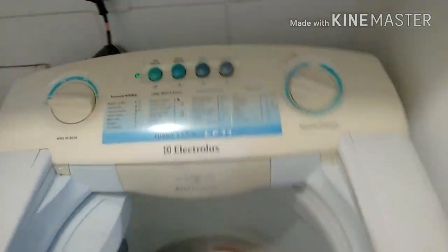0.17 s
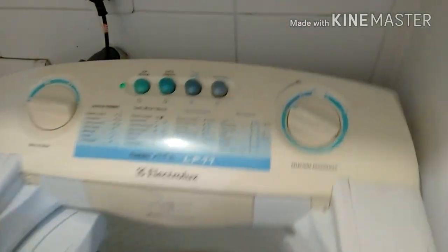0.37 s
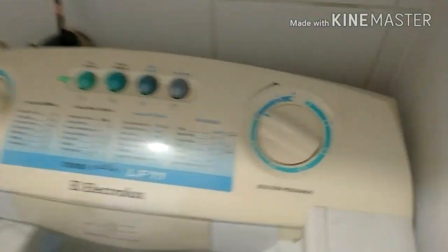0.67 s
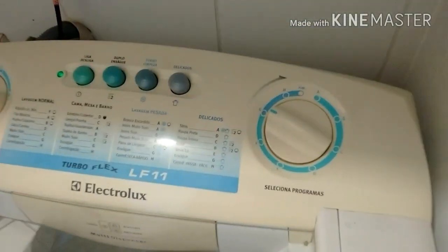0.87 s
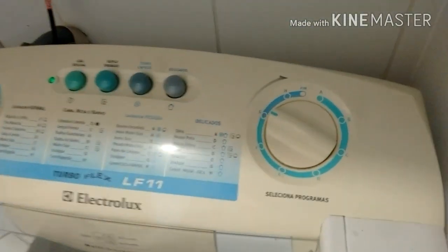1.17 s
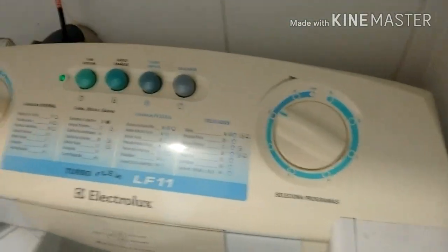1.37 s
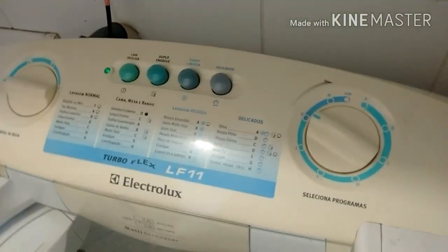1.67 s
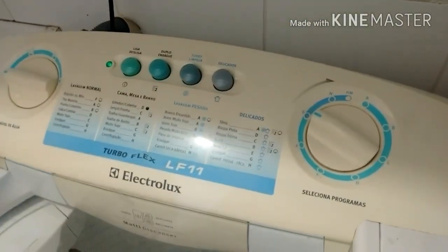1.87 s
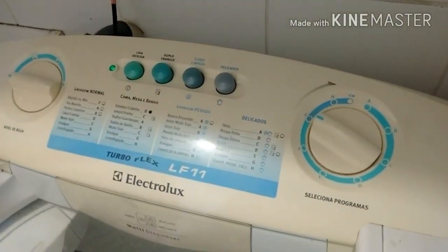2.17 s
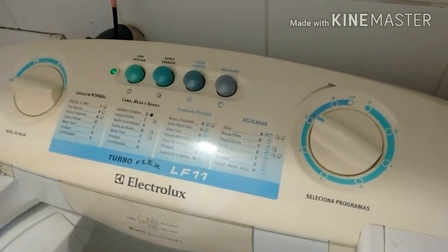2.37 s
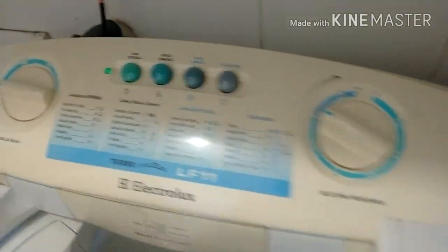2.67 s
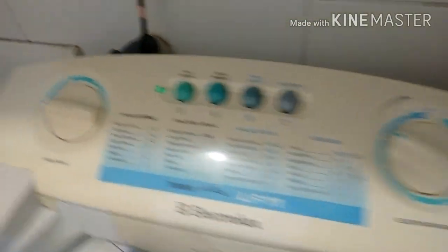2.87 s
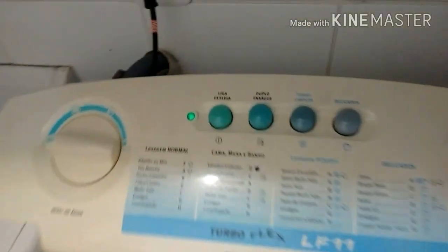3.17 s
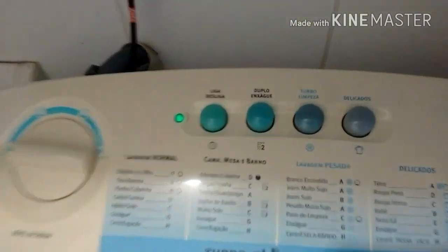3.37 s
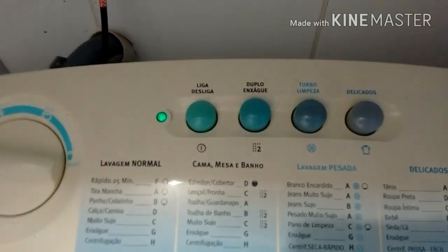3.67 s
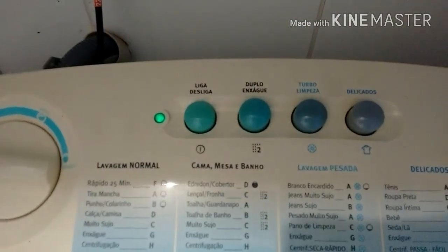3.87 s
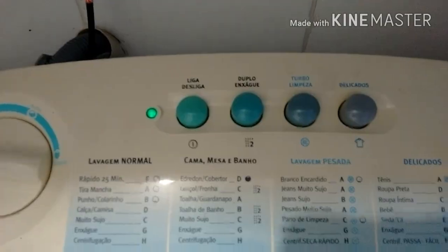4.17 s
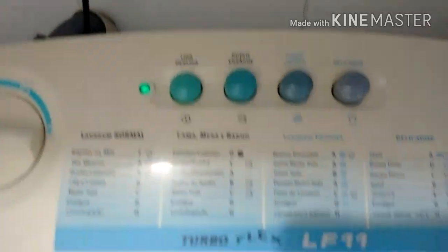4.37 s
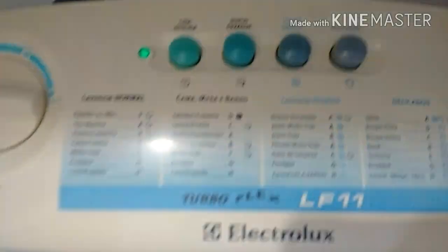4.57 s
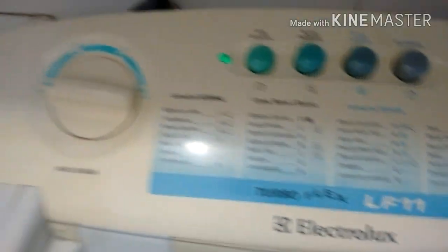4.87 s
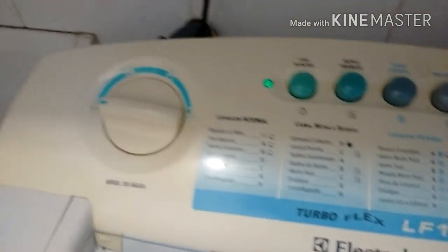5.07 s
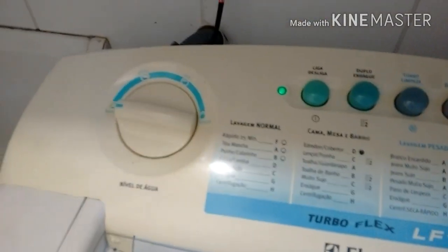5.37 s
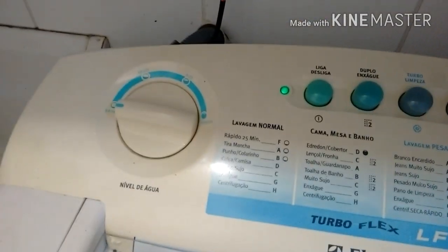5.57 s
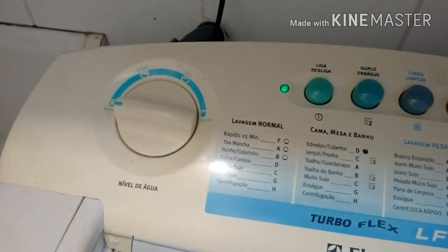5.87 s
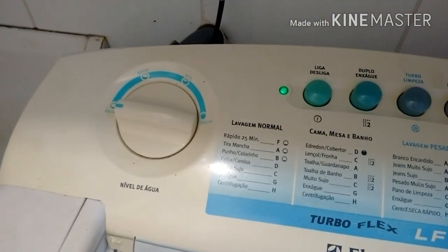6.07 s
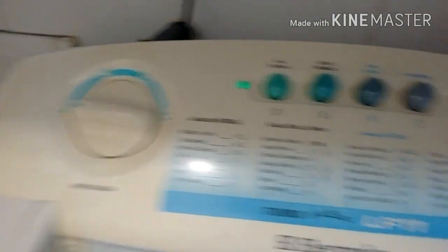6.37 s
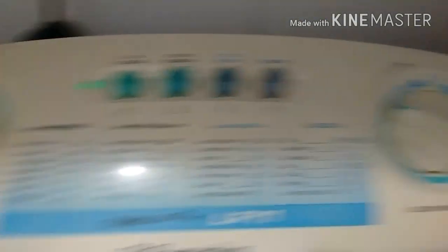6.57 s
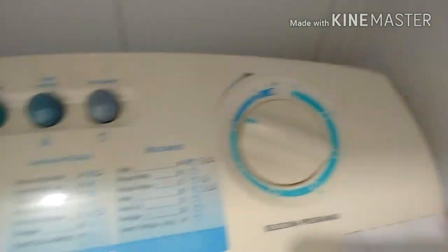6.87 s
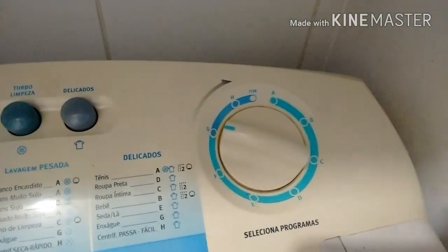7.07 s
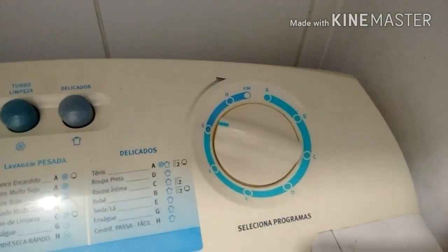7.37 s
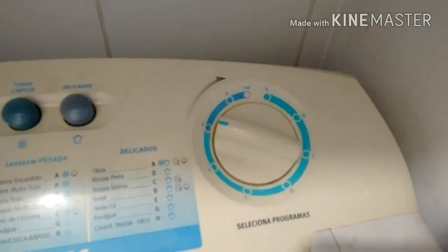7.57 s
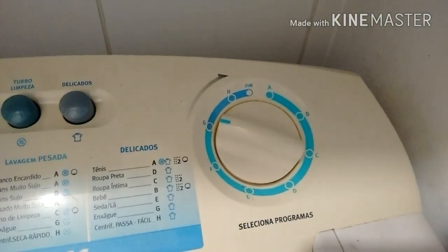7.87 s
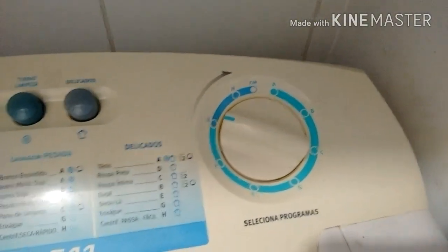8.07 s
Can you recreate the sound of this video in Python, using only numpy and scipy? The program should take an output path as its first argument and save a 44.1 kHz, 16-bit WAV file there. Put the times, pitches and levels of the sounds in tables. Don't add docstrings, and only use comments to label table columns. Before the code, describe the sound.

A washing machine spins steadily close by in a tiled room, a buzzing low hum under a rough airy whir with faint spray puffs.

```python
import sys
import numpy as np
from scipy import signal
from scipy.io import wavfile
from scipy.ndimage import uniform_filter1d

SR = 44100
rng = np.random.default_rng(int(sys.argv[2]) if len(sys.argv) > 2 else 0)


def unload_audio(sound):
    columns = np.transpose(np.atleast_2d(sound))
    steps = np.round(np.clip(columns, -1, 1) * 32767)
    wavfile.write(sys.argv[1], SR, steps.astype(np.int16))


def nominal_scale(level):
    x = np.asarray(level, float) / 20
    return 10 ** x


N = 362502
MAINS_HZ = 59.98


def evened(x):
    return x / np.sqrt(np.mean(x ** 2) + 1e-20)


def read(points, hz):
    f, value = np.transpose(points)
    return np.interp(np.log(hz + 1), np.log(f + 1), value)


def curve(rows, t):
    s, *columns = np.transpose(rows)
    return [np.interp(t, s, c) for c in columns]


def drift(t, top_hz):
    hz = np.geomspace(.2, top_hz, 16)[:, None]
    waves = np.sin(2 * np.pi * (hz * t + rng.random((16, 1)))) / np.sqrt(hz)
    return evened(waves.sum(0))


def bump(x, middle, width):
    return np.exp(-((x - middle) / width * 2) ** 4)


# t/s, along the panel (-1 left to 1 right), into the corner (-1 to 1),
# nearness/dB, turn as left minus right/dB
HAND = [(0, -0.12, -0.22, -3, -1), (.3, 0.28, 0.2, -2, 1), (.75, 0.8, -0.6, -1, -0.5),
        (1.7, 1, -0.97, -0.5, -2), (2.75, 0.98, -0.42, 0, -0.5), (2.95, 0.39, -0.25, 0.5, -1.5),
        (3.3, -0.25, 0.22, -0.5, -1), (4.4, -0.83, 0.15, 0, -0.6), (4.75, -1.13, 0.38, 0.4, 0),
        (5.15, -0.43, -0.38, 1.5, -2.5), (5.6, -0.93, -0.076, 0, -1), (6.4, -1.27, 0.25, -1.7, -0.7),
        (6.85, 0.87, 1.65, -1.2, -1.5), (7.2, 0.76, 0.92, 0.5, -0.1), (7.5, 0.71, 0.76, 0.5, -1),
        (8.3, 1, 1.1, 0, -1.5)]


def at_hand(laws, t):
    along, corner = curve(HAND, t)[:2]
    return np.asarray(laws) @ [np.ones(len(t)), along, corner]


# multiple of the mains, level at mid panel/dB, change per step along/dB,
# change per step into the corner/dB
HUM_LEFT = [(2, -51.5, -2.5, -3.5), (3, -60.5, 8, 1), (4, -47, 2.5, 3), (5, -37, 0, 2.5), (6, -31, 1.3, 1),
            (7, -43, -3.5, -1), (8, -38, 1.3, 0), (9, -50, 6, 2), (10, -41.5, 0, -2.5), (11, -46.5, -4, 0),
            (12, -58.5, 11.5, -10), (13, -49.5, 3.5, 4), (14, -52.5, -9, -15), (15, -54.5, -3, 3),
            (16, -65, 1.9, -4.0), (17, -71.5, -2, 1), (18, -65, -9, 3.4)]
HUM_RIGHT = [(2, -52.5, 0.5, -0.5), (3, -54.5, 1.5, -2), (4, -39, -1.6, 0.7), (5, -39.5, 4.5, 0.7),
             (6, -30, -1.6, 0.2), (7, -41, -2, -6), (8, -40.5, 2.5, 2), (9, -48, -1, 5), (10, -40, -2, -2),
             (11, -46.5, -7, -4), (12, -44.5, 8, -1), (13, -53.5, 18.5, -0.5), (14, -50, -7.5, -3),
             (15, -50, 3.5, 0.5), (16, -69, 8, -4), (17, -66, -4, -6), (18, -73, -7, 1)]
HUM_LEAD = [(2, 2.5, -1, 1.7), (3, -0.5, -0.39, 0.2), (4, 0.62, -0.034, -0.3), (5, 1.5, -1.3, 0.42),
            (6, 0.08, -0.46, -0.1), (7, -0.9, -0.39, 1), (8, 1, -0.79, 0), (9, -0.4, 1.2, 0.1),
            (10, 0, -0.97, 0.2), (11, -0.4, -0.82, 0), (12, 0.7, -0.38, 0.3), (13, 1.0, 0.32, 0.6),
            (14, -1.8, -1.5, -2.5), (15, -0.3, 0.19, 1.6), (16, 0, 0.86, 0), (17, -1, -0.11, 4),
            (18, -0.5, 0.1, -0.7)]
# middle t/s, length/s, multiple of the mains, level/dB
NODES = [(3.3, .6, 5, -6), (4.5, .7, 5, 2), (6.2, .4, 5, 3), (.3, .7, 5, -3), (7.9, .6, 5, -2),
         (3.8, .12, 6, 3), (5.65, .15, 6, -4), (4.15, .2, 6, -2), (7.8, .4, 6, -2), (6.9, .4, 6, 2.5),
         (3.3, .6, 6, 1.5), (.45, .8, 7, 6), (2.2, .4, 7, 4), (4., .8, 7, -2), (7.7, .9, 7, 2),
         (.55, 1.1, 8, -5), (3.9, .6, 8, -4), (5.6, .8, 8, -4), (3.15, .9, 9, -18), (5.8, .4, 9, -8),
         (1.6, 1., 9, 4), (4.4, .7, 9, 3), (6.7, .9, 9, -4), (5., .4, 9, -4), (3.3, .6, 10, 5),
         (5.7, .8, 10, -2), (6.8, .8, 10, 2), (2.6, 1.2, 11, -8), (.6, .5, 11, -5), (4.5, 1., 11, -4),
         (5.2, .8, 11, -6), (7.3, .6, 11, 5), (3.05, .6, 12, -18), (4.4, .8, 12, 8), (5.2, .8, 12, -8),
         (6.2, 1., 12, 4), (2.4, 1.6, 13, -6), (3.6, .8, 13, 4), (5.4, .4, 13, 7), (7., .4, 13, -8),
         (8., .7, 13, -9), (3.1, .7, 14, 10), (3.9, .6, 14, -6), (.2, .4, 14, 8), (7., .4, 14, -5),
         (1.8, 3., 15, -4), (6.2, .4, 15, -5), (2.9, .7, 4, -2), (.4, .9, 4, -2), (4.1, .7, 4, 1.5)]
HUM_FOLLOWS = 0.97


def hum(spread_rad=1.8, waver_db=.8, wander_rad=.2):
    t, slow = np.arange(N) / SR, np.arange(0, N / SR + .02, .01)
    out = np.zeros((2, N))
    for rows in np.transpose([HUM_LEFT, HUM_RIGHT, HUM_LEAD], (1, 0, 2)):
        k = round(rows[0, 0])
        change_db = HUM_FOLLOWS * curve(HAND, slow)[2] + waver_db * k / 6 * drift(slow, 10)
        for s, length, multiple, db in NODES:
            if round(multiple) == k:
                change_db = change_db + db * bump(slow, s, length)
        left_db, right_db, lead = at_hand(rows[:, 1:], slow)
        wander = np.interp(t, slow, wander_rad * k / 6 * drift(slow, 5))
        turn = 2 * np.pi * k * MAINS_HZ * t + spread_rad * k ** 2 + wander
        out[0] += np.interp(t, slow, nominal_scale(left_db + change_db)) * np.cos(turn + np.interp(t, slow, lead))
        out[1] += np.interp(t, slow, nominal_scale(right_db + change_db)) * np.cos(turn)
    return np.sqrt(2) * out


# f/Hz, left level/dB, right level/dB, left lead/rad
TONES = [
    (117.3, -55, -56, 1.2),
    (46.6, -59, -64, .3),
    (55, -66, -70, .3),
    (9732, -90, -82, 1.5),
]
# start t/s, end t/s, level over its floor/dB
WHINE = [
    (1.0, 2.7, 9.5),
    (4.5, 6.5, 10.5),
    (6.5, 7.5, 5.5),
]
WHINE_HZ, WHINE_DB, WHINE_RISE_S = 4807, -75.5, .2


def tones(waver_db=1.4):
    t = np.arange(N) / SR
    slow = t[::400]
    out = np.zeros((2, N))
    for hz, left_db, right_db, lead in TONES:
        level = nominal_scale([[left_db], [right_db]]) * np.interp(t, slow, nominal_scale(waver_db * drift(slow, 9.8)))
        wander = np.interp(t, slow, 1.6 * drift(slow, 2))
        out += level * np.sin(2 * np.pi * hz * t + wander + [[lead], [0]])
    swell_db = sum(db * np.clip(np.minimum(t - a, b - t) / WHINE_RISE_S + .5, 0, 1) for a, b, db in WHINE)
    whine = nominal_scale(WHINE_DB + swell_db + [[-3], [0]]) * np.sin(2 * np.pi * WHINE_HZ * t + [[2.4], [0]])
    return np.sqrt(2) * (out + whine * np.interp(t, slow, nominal_scale(waver_db * drift(slow, 6))))


# f/Hz, coherence (0-1)
SAME = [(40, 0.63), (100, 0.19), (210, 0.94), (280, 0.9), (380, 0.73), (1100, 1), (3600, 0.8), (5500, 0.31),
        (8600, 0.68), (9600, 0.16), (15000, .25)]


def port_noise(frames, hz, first_hz=1020, step_hz=1250, skew=0.8):
    a, b, c, d = rng.standard_normal((frames, len(hz), 4)).T
    turn = np.pi * np.maximum(hz - first_hz, 0) / step_hz
    lean = np.clip(skew, 0, 1) / (1 + (hz / 4500) ** 8)
    same = (np.clip(read(SAME, hz), 0, 1) * (np.cos(turn) - 1j * lean * np.sin(turn)))[:, None]
    right = a + 1j * b
    left = same * right + np.sqrt(1 - abs(same) ** 2) * (c + 1j * d)
    return np.array([left, right])


# f/Hz, width/Hz, level over the bed at mid panel/dB, change per
# step along/dB, change per step into the corner/dB
MODES = [(48.6, 13.4, 14, -2.5, -1), (111, 21, 6, 0, 0.5), (195.2, 6.6, 11.5, 0, -0.5),
         (268.1, 14.4, 8, -0.3, 1), (351.1, 6.1, 14.5, -1, 4), (444, 41, 6.5, -0.4, 1.5),
         (507.5, 12.6, 11, 0.8, -2), (577.7, 51, 9.5, 1.5, 1.5), (669, 33, 7, 2, 0),
         (739, 43, 7.5, -1.2, -2), (803, 24, 6, -1.5, 3), (823, 61, 1, -1, -2),
         (1005, 19, 5, 1, -2.5), (1115, 46, 7, -0.5, 4), (1223, 47, 1.5, 4, -3.5), (1447, 40, 9, -3, 8),
       (1552, 91, 11.5, 1.5, 2), (1666, 104, 8, -1, 0.5), (1825, 48, 5, -4.5, 0), (2043, 100, 7.5, 0.7, -1),
       (2270, 52, 4, 0, -6.5), (3354, 25, 3.5, -5, 3.5), (3555, 26, 7.5, -1, 2), (3800, 100, 5, -0.5, 0),
       (4090, 100, 4.5, -0.5, 1.5)]


def panel_ring(hz, t, sway=0.0096):
    ring = 0
    for f, width, *law in MODES:
        height = (nominal_scale(at_hand(law, t)) ** 2 - 1).clip(0)
        offset = 2 * (hz[:, None] - f * (1 + sway * drift(t, 2))) / width
        ring = ring + height / (1 + offset ** 2) ** 2
    return ring


# middle t/s, length/s, f/Hz, width/Hz, level/dB
SWELLS = [(3, 0.37, 1560, 150, 6), (2.02, 1.2, 1540, 48, 5.5), (4.24, 1.5, 1710, 160, 5.5),
          (4, 1.9, 1730, 90, -3), (5.53, 1.8, 1450, 70, 5.5), (6, 2., 1560, 70, -1), (3.3, 0.16, 900, 61, 6),
          (6.4, 0.17, 1100, 90, 3), (5.7, 0.56, 1110, 54, -0.5), (1.6, 2.7, 1190, 140, 1),
          (7.54, 1.9, 1300, 100, 7.5), (4.7, 1.2, 1200, 110, -7), (0.4, 0.83, 945, 47, 9),
          (0.55, 0.5, 1450, 80, 6), (7., 0.67, 1560, 120, 0.5), (1.4, 1.1, 576, 80, 3),
          (1., 0.23, 500, 50, 2.5), (8.1, 0.44, 420, 67, 2), (3.94, 0.29, 750, 170, 4.5),
          (4.65, 1.2, 600, 120, 4), (6.4, 0.44, 590, 110, -3.5), (7.8, 2.3, 800, 51, 3),
          (5.67, 2.4, 840, 53, 5), (8.5, 1.2, 200, 40, 2), (2.3, 1.1, 3400, 130, 7), (1.95, .6, 3200, 88, 8),
          (0.73, 0.064, 3600, 1500, 5), (3.5, 1, 3300, 350, 2), (5.05, 0.27, 3300, 310, 3),
          (3.1, .4, 3900, 350, -1), (7.1, 0.4, 3820, 560, 3.5), (6.7, .4, 3020, 270, 6.5),
          (9.3, .4, 2300, 150, 3), (7.85, 0.14, 3800, 900, 4.5), (5.46, .6, 3500, 1100, -2.5),
          (1.44, 0.23, 3500, 1200, 0.5), (4.3, .5, 2200, 200, -1), (1.76, 0.19, 3400, 2900, -3),
          (7.55, 0.35, 3200, 1200, -2.5), (4.8, 0.35, 3300, 1100, -4),
          (.05, .6, 480, 300, -4), (.05, 1.2, 1530, 90, -4.4), (.05, 1.2, 1650, 200, 2.7),
           (.05, 1.2, 2310, 90, -5.8), (.05, 1.2, 2560, 90, -4.3), (1.14, .6, 1290, 90, 4.3),
           (1.5, .4, 780, 250, 2.5), (2.16, .6, 790, 90, 4.9), (2.21, 1.2, 2170, 90, -4.4),
           (2.48, 1.2, 2030, 90, -4.9), (3.44, 1.2, 1150, 90, 3.5), (3.69, 1.2, 2400, 90, 4.3),
           (4.2, 1.2, 2540, 90, -4.7), (4.43, .3, 1100, 1600, -2.1), (4.46, 1.2, 2030, 90, -4.5),
           (5.32, 1.2, 2380, 200, -3.9), (5.62, .3, 1410, 90, -7), (5.76, 1.2, 2710, 90, -5.2),
           (5.8, .3, 700, 600, -1.7), (5.8, 1.2, 1670, 90, -4.7), (5.99, 1.2, 2230, 90, 5.3),
           (6.18, 1.2, 1780, 90, 4.1), (7.22, 1.2, 2400, 90, 4), (7.48, .6, 1260, 90, -5),
           (8.29, .3, 790, 200, 6), (8.29, .6, 520, 90, -4), (8.29, 1.2, 2210, 90, 4.5),
           (8.29, 1.2, 2550, 90, -4.8), (.75, .3, 780, 250, -2), (6.35, .3, 560, 150, 2),
           (5.1, .3, 3450, 300, 2), (7., .7, 3600, 900, 2), (6.75, .9, 2400, 900, 2.5),
           (1.1, .3, 3500, 1000, 2), (4.75, .3, 2400, 800, 2), (.4, .3, 1110, 70, 4),
           (2.6, .5, 1110, 70, -2.5), (6.9, .4, 1110, 70, -3.5), (7.65, .25, 185, 50, -4),
          (.4, 1., 990, 40, -6),
    (3.15, .3, 1150, 300, -2.5),
    (6.1, 1.3, 860, 60, 5),
    (3.6, 1., 800, 40, 3),
    (4.8, .6, 3500, 500, 1.5),
    (6.4, .3, 560, 170, 2.5),
    (4.2, .3, 560, 170, 2),
    (3.25, .3, 1550, 500, 2.5),
    (7.9, .3, 560, 170, -2),
    (4.85, .7, 1125, 60, -3),
]
# f/Hz, width/Hz, level/dB
LASTING = [(195, 18, 3), (213, 14, -4), (266, 12, 2), (280, 10, -3), (342, 12, -2), (690, 24, 2.5),
           (767, 22, -3), (865, 40, -2.5), (1115, 50, -3), (330, 16, -1.5), (395, 20, -1.5), (630, 30, -1.5),
           (3290, 30, 3), (3690, 30, -2), (3840, 30, 3), (1900, 180, 2), (2220, 60, 2.5), (2420, 60, 2),
           (3620, 60, 3), (3950, 110, 2), (4240, 110, 3), (4640, 120, 3)]


def swells_and_dips_db(hz, t):
    passing = sum(db * bump(t, s, length) * bump(hz[:, None], f, width)
                  for s, length, f, width, db in SWELLS)
    return passing + sum(db * bump(hz[:, None], f, width) for f, width, db in LASTING)


def mottled(bins, frames, over_bins, over_frames):
    x = uniform_filter1d(rng.standard_normal((bins, frames)), size=over_bins, axis=0)
    return evened(uniform_filter1d(x, size=over_frames, axis=1))


# f/Hz, level per Hz/dB
BED = [(15, -87), (32, -83), (75, -77.5), (155, -76.5), (235, -67), (400, -61.5), (820, -65.5), (950, -71),
       (2600, -80.5), (3500, -81), (4700, -88), (8200, -97), (12000, -92), (15400, -93.5)]
# f/Hz, left minus right level/dB
TILT = [(25, -1), (45, -4), (110, 4.5), (200, -3), (330, 1), (750, -2.5), (1100, -0.5), (1650, -3.5),
        (2600, -3), (8600, -1.5), (10400, -3), (11300, -8), (12300, -5.5), (13000, -11), (15400, -6)]
RUMBLE_FOLLOWS, WHIR_FOLLOWS, HISS_FOLLOWS = 0.19, 1, 0.29
SWELL_DB, STREAK_DB = .55, 1.7


def machine_noise(size=4096, patchy_db=1.35):
    hop = size // 4
    frames, hz = N // hop + 5, np.fft.rfftfreq(size, 1 / SR)
    t = np.arange(frames) * hop / SR
    near_db, pan_db = curve(HAND, t)[2:]
    mid, top = (1 / (1 + (edge_hz / (hz[:, None] + 1)) ** 4) for edge_hz in (1200, 6500))
    follows = (1 - mid) * RUMBLE_FOLLOWS + (mid - top) * WHIR_FOLLOWS + top * HISS_FOLLOWS
    level_db = follows * near_db + SWELL_DB * (mid - top + 0.31) * drift(t, 5)
    level_db = level_db + patchy_db * (0.47 + 0.86 * mid - 0.26 * top) * mottled(len(hz), frames, 20, 3)
    level_db = level_db + STREAK_DB * (mid - top + 0.3) * mottled(len(hz), frames, 4, 24)
    level_db = level_db + swells_and_dips_db(hz, t)
    right = nominal_scale(read(BED, hz)[:, None] + level_db) * np.sqrt(1 + panel_ring(hz, t))
    tilt_db = read(TILT, hz)[:, None] + pan_db - pan_db.mean()
    z = port_noise(frames, hz) * right * [nominal_scale(tilt_db), np.ones_like(tilt_db)]
    return signal.istft(z, nperseg=size, noverlap=size - hop)[1][:, :N] * nominal_scale(13.0)


def bursts(rows, length_s, rise_s=0.0054):
    s = np.arange(N) / SR
    slow = s[::64]
    total = 0
    for at, db in rows:
        rise = np.clip((slow - at) / rise_s, 0, 1)
        total = total + nominal_scale(db + 36.5) * rise * np.exp(-(np.maximum(slow - at, 0) / length_s) ** 2)
    return np.interp(s, slow, total)


def flicker(db):
    x = uniform_filter1d(rng.standard_normal(N), size=900)
    return nominal_scale(db * evened(uniform_filter1d(x, size=900)))


def band(x, order, hz, kind, both_ways=signal.sosfiltfilt):
    return both_ways(signal.butter(order, hz, kind, fs=SR, output="sos"), x)


# t/s, peak level/dB
PUFFS = [(2.222, -40), (2.552, -48), (2.898, -42), (3.14, -36), (3.185, -44), (3.89, -48), (4.19, -41),
         (4.495, -43), (4.575, -43), (4.683, -50), (4.962, -43), (5.065, -48), (5.108, -44), (5.205, -48),
         (5.749, -36), (6.135, -52), (6.18, -42), (6.62, -46), (6.94, -40), (7.19, -39), (7.23, -44),
         (7.7, -41), (7.83, -47), (8.07, -47)]
# t/s, peak level/dB
KNOCKS = [
    (.122, -38),
    (.448, -42),
    (2.135, -35),
    (3.58, -37),
    (4.666, -37),
    (5.773, -40),
    (6.177, -39),
    (7.478, -39),
]
PUFF_S, KNOCK_S = 0.03, .013
JOLT = 0.25
RUSH_DB, RUSH_ENDS_S = -6, .31


def rumble_and_hiss(throb=0.056):
    x, s = machine_noise(), np.arange(N) / SR
    treble = band(x, 2, (1100, 6000), "band")
    wall = band(x, 2, (1600, 2900), "band")
    spray = band(x, 2, 7000, "high")
    whir = band(x, 1, (500, 2500), "band")
    jolts, knocks = bursts(PUFFS, PUFF_S), bursts(KNOCKS, KNOCK_S)
    rush = nominal_scale(RUSH_DB) * bump(s, 0, 2 * RUSH_ENDS_S) ** 2
    torque = throb * np.cos(4 * np.pi * MAINS_HZ * s) + 0.13 * np.cos(2 * np.pi * MAINS_HZ * s)
    out = (1 + JOLT * jolts) * x + knocks * wall + (flicker(.9) - 1) * treble
    out += (jolts + rush + flicker(.9) - 1) * spray * [[.6], [1]]
    return out + torque * whir


# t/s, left level/dB, right level/dB, f/Hz
THUMPS = [
    (.03, -52, -40, 40),
    (1.034, -44, -31, 135),
    (2.905, -33, -28, 135),
    (3.185, -39, -37, 140),
]
# t/s, left level/dB, right level/dB, f/Hz
TICK = (6.387, -25, -39, 7500)


def handling():
    out = np.zeros((2, N))
    for s, left_db, right_db, hz in THUMPS + [TICK]:
        middle = round(s * SR)
        at = np.arange(max(middle - 1300, 0), middle + 1300)
        u = (at / SR - s) * hz * 2.2
        pulse = (1 - 2 * u ** 2) * np.exp(-u ** 2)
        out[:, at] += nominal_scale([[left_db], [right_db]]) * [[-1], [1]] * pulse
    return out


def scene():
    return hum() + tones() + rumble_and_hiss() + handling()


# f/Hz, share (0-1)
DROPOUT = [(9500, 0), (10300, .35), (11200, .45), (11700, .12), (12600, .1), (13300, .5), (13700, .05),
           (14100, .08), (14400, .75), (14800, .3), (15100, .65), (15300, .95)]
# f/Hz, share (0-1)
MID_DROPOUT = [(1950, 0), (2150, .13), (2500, .1), (2750, 0), (4300, 0), (4700, .07), (5200, .07),
               (5500, 0), (6900, 0), (7150, .22), (7450, .22), (7700, 0), (9000, 0), (9500, .12),
               (10000, 0)]


def dropouts(x, chance):
    hz, t, z = signal.stft(x, SR, nperseg=1024)
    draw = rng.random((len(t) // 4 + 1, len(hz) // 5 + 1))
    draw = np.repeat(np.repeat(draw, 4, axis=0), 5, axis=1)[:len(t), :len(hz)].T
    return signal.istft(z * (draw > read(chance, hz)[:, None]), nperseg=1024)[1][:N]


def top_cut(x):
    return signal.sosfilt(signal.butter(12, 15480, fs=SR, output="sos"), x)


def record(dry):
    mid, side = dropouts(dry.mean(0), MID_DROPOUT), (dry[0] - dry[1]) / 2
    mix = np.array([dropouts(mid + side, DROPOUT), mid - side])
    return top_cut(mix)


dry = scene()
out = record(dry)
unload_audio(out)
```